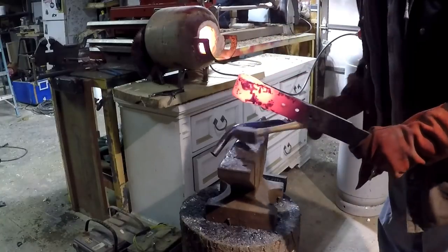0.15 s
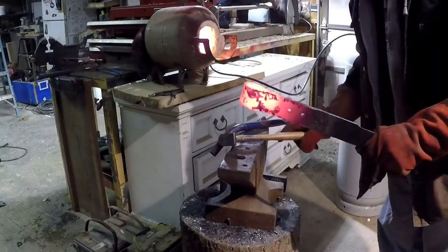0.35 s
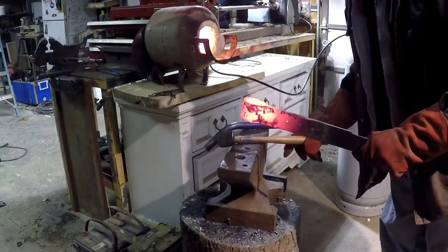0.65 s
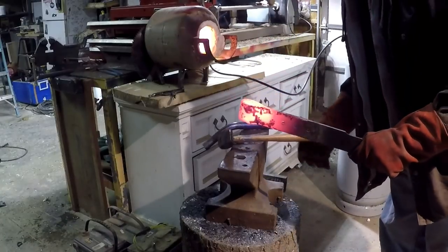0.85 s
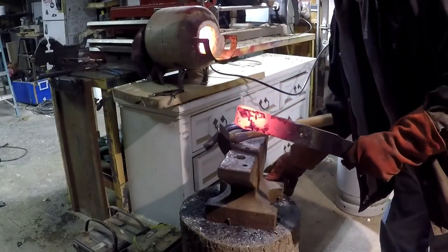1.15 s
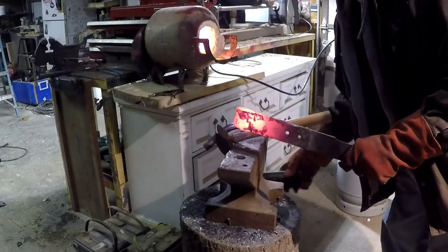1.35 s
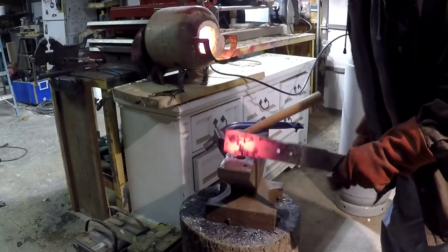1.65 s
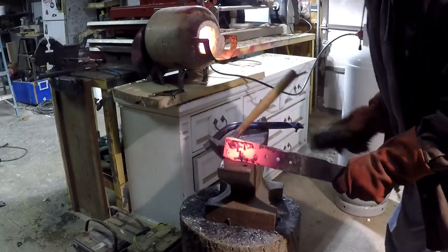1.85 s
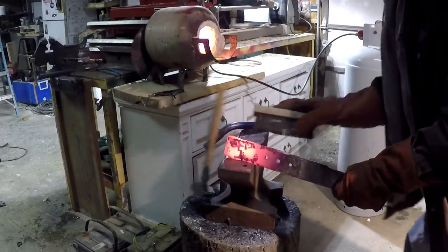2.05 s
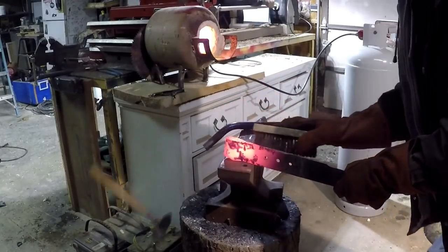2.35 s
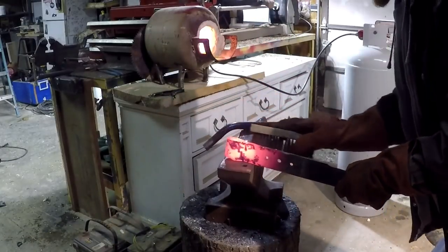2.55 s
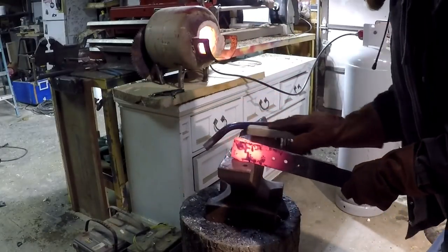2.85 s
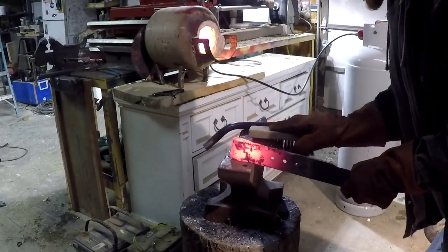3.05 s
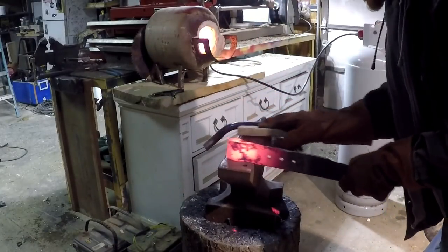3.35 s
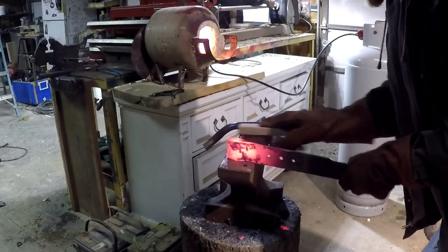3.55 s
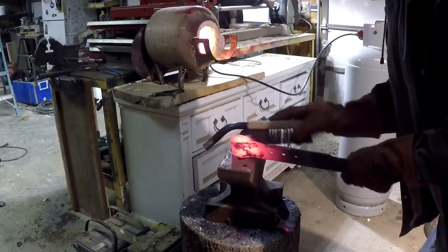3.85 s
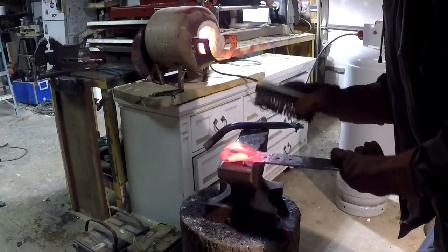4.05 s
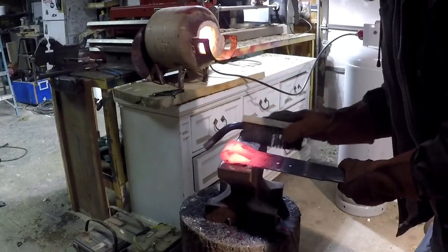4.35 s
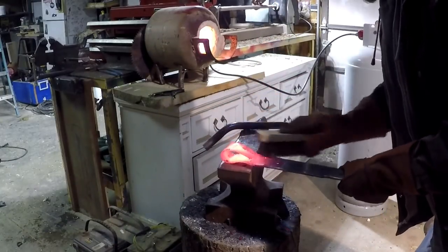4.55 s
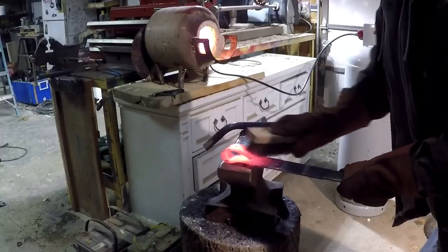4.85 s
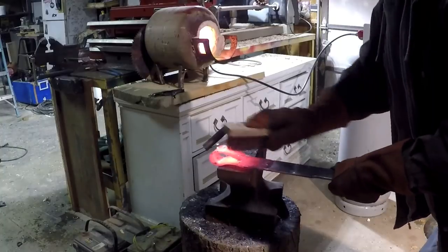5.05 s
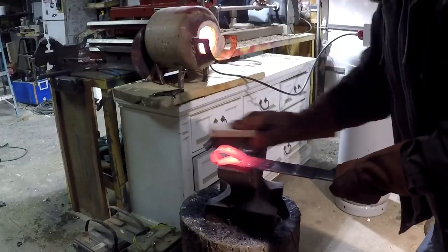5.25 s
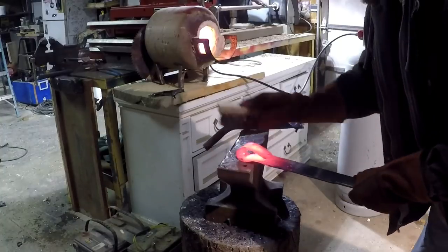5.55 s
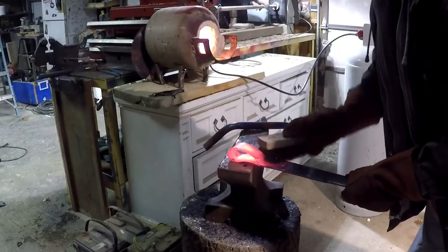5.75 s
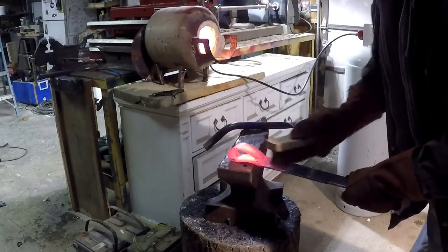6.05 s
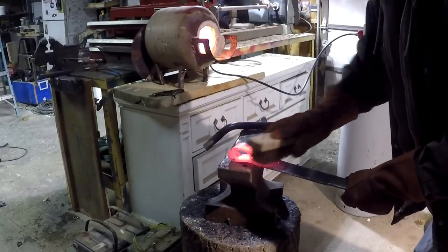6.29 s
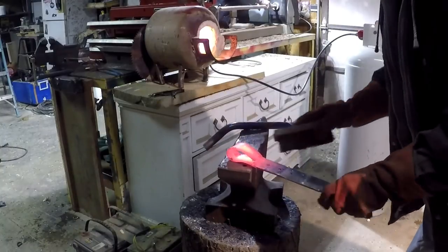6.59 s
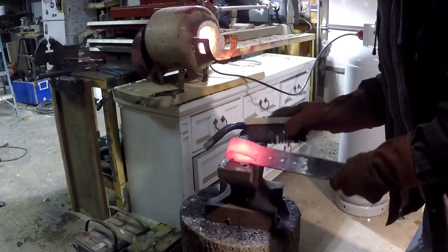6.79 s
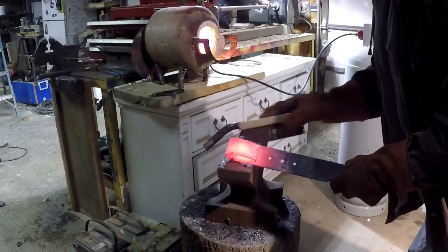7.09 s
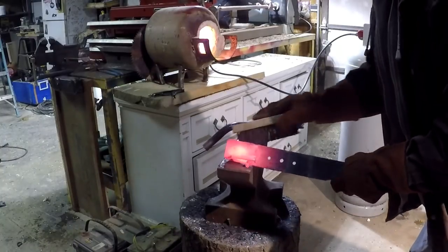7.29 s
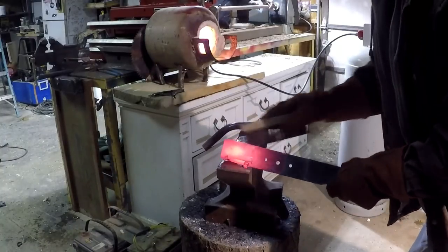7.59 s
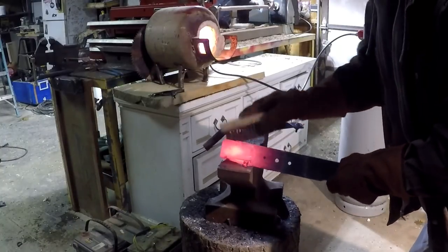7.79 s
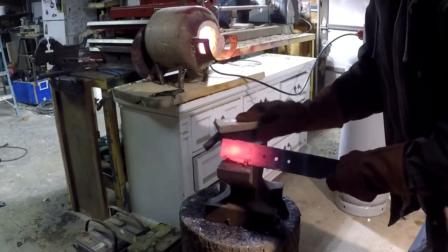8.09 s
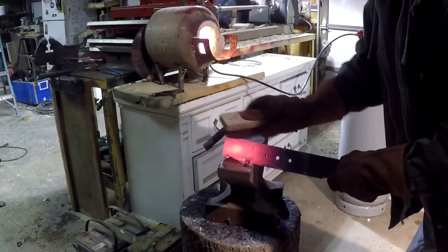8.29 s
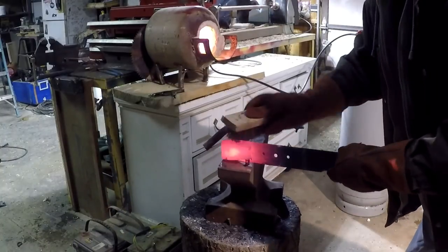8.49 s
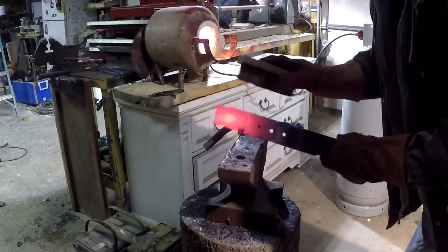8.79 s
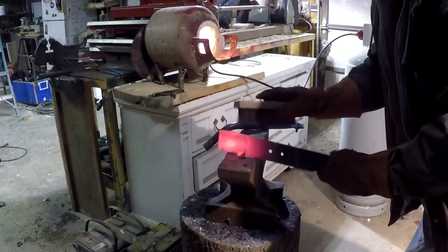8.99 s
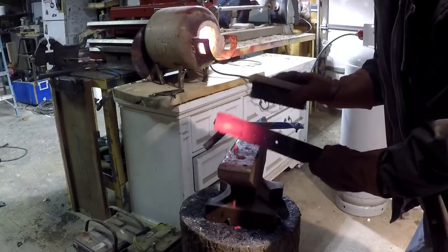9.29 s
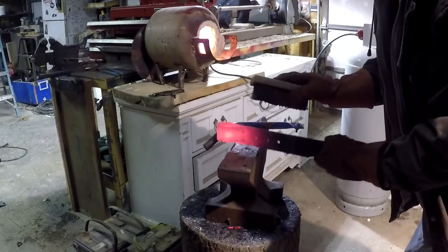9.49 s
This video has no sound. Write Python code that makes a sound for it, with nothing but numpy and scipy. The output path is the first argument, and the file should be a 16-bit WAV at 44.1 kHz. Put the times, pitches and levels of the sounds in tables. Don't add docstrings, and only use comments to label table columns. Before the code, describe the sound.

Throughout, a gas forge roars close by in a garage: deep, loud, turbulent burning noise with boomy resonances, plus a thin steady gas hiss. Faint rustling opens it, with a light hammer tap at 0.3 s. At 1.8 s a steel bar clinks brightly. At 2.1 s the hammer slides off, a block knocks at 2.3, and the hammer lands hard at about 2.7, its handle bouncing in quick taps, tipping over with a ringing clack near 3.0. Soft wire-brush scrapes follow from 3.2, with faint ticks near 3.6-4.2. A hard clink at 4.9 begins faster rasping strokes; knocks fall at 5.8, 6.05 and 6.4, where brushing is loudest and scratchiest. Sweeps soften from 7 to 8.9. The bar clanks on the anvil face at 9.1, its edge at 9.3, and a short knock comes at 9.5. The small stereo microphone compresses the roar; treble is cut off.

```python
import sys
import numpy as np
from scipy import signal
from scipy.fft import rfft, irfft
from scipy.io import wavfile
from scipy.ndimage import uniform_filter1d, minimum_filter1d

SR = 44100
rng = np.random.default_rng(int(sys.argv[2]) if len(sys.argv) > 2 else 0)


def convert_level_to_amplitude(level_db):
    exponent = np.asarray(level_db, float) / 20
    return 10 ** exponent


def transcribe(signal):
    frames = np.atleast_2d(signal).T
    limited = np.clip(frames, -1, 1)
    pcm = np.round(limited * 32767).astype(np.int16)
    wavfile.write(sys.argv[1], SR, pcm)


N = 424683
HZ = np.fft.rfftfreq(N, 1 / SR)


def evened(x):
    return x / np.sqrt(np.mean(x ** 2) + 1e-20)


def smoothed(x, samples):
    return uniform_filter1d(uniform_filter1d(x, samples), samples)


def read(points, hz, column=1):
    rows = np.transpose(points)
    return np.interp(np.log(hz + 1), np.log(rows[0] + 1), rows[column])


def ports(near, other):
    # pitch_hz, level_db, lead_rad, likeness [0-1]
    port_table = [(20, -2, -.2, .98), (100, -4, -.2, .99), (200, -7.5, -.15, 1), (300, -12, -.1, .99),
                  (345, -18, .3, .92), (370, -15.5, .4, .93), (402, -22, 1, .6), (440, -16, 1.9, .97),
                  (520, -10.5, 2.6, .99), (620, -7, 2.9, .95), (760, -10.5, 3, .8), (1000, -4, 1.8, .65),
                  (1500, -1, 1.2, .7), (2300, -.5, .8, .68), (3600, -1, .15, .85), (5000, -4, .2, .5),
                  (5800, -6, .4, .6), (7400, 2, 1.2, .3), (9000, 0, 0, .12), (14000, -1, 0, .3)]
    level_db, lead_rad, likeness = (read(port_table, HZ, column=k) for k in (1, 2, 3))
    likeness = np.clip(likeness, 0, 1)
    shared = likeness * np.exp(1j * lead_rad) * rfft(near)
    unrelated = np.sqrt(1 - likeness ** 2) * rfft(other)
    left = irfft(convert_level_to_amplitude(level_db) * (shared + unrelated), N)
    return np.array([left, near])


def coloured(pair, gain):
    near, other = irfft(rfft(pair) * gain, N)
    scale = np.std(near)
    return ports(near / scale, other / scale)


def jet():
    # pitch_hz, density_db_per_hz
    jet_spectrum = [(470, -38.5), (800, -2.5), (960, -10), (1230, -10), (1300, -9), (1560, -9),
                    (1850, -12.5), (2150, -14.5), (2770, -22.5), (3370, -19), (4090, -24.5), (6340, -21),
                    (8500, -33), (10300, -41), (14700, -66)]
    level_db, waver_db = -40.5, 1.3
    waver = evened(smoothed(rng.standard_normal(N), 3000))
    hiss = coloured(rng.standard_normal((2, N)), convert_level_to_amplitude(read(jet_spectrum, HZ)))
    return convert_level_to_amplitude(level_db + waver_db * waver) * hiss


def clatter(t60_s, length=16384):
    # pitch_hz, t60_factor
    shop_decay = [(500, 2), (2000, 1.42), (5000, 0.95), (7800, 1.3), (9500, 0.86)]
    hz, t, z = signal.stft(rng.standard_normal((2, length)), SR, nperseg=128)
    band_t60_s = t60_s * read(shop_decay, hz)[:, None]
    tail = signal.istft(z * convert_level_to_amplitude(-60 * t / band_t60_s), SR, nperseg=128)[1][:, :length]
    tail *= np.clip((np.arange(length) / SR - 0.001) / 0.0014, 0, 1)
    return tail / np.linalg.norm(tail[0])


def blow(modes, crack_hz, ring_db, clatter_db, t60_s, rough=0.45):
    strike_db, strike_s = 6.5, 0.0026
    t = np.arange(16384) / SR
    crack = np.exp(-t * crack_hz * 2.22) * np.sin(2 * np.pi * crack_hz * t)
    slap = crack + 0.087 * np.roll(crack, 62) - 0.33 * np.roll(crack, 115)

    wander = rng.standard_normal((2, len(modes), len(t) // 4))
    level_flutter, phase_flutter = evened(smoothed(wander, 50)).repeat(4, axis=-1)
    hz, db, decay_s = np.transpose(modes)[:, :, None]
    fade = convert_level_to_amplitude(db - 60 * t / decay_s) + convert_level_to_amplitude(db / 2 + strike_db) * np.exp(-t / strike_s)
    tones = np.sin(2 * np.pi * hz * t + rough * phase_flutter)
    ring = (fade * (1 + rough * level_flutter / 2) * tones).sum(axis=0)
    ring *= convert_level_to_amplitude(ring_db) * (1 - np.exp(-t / 0.0002))

    source = 3.64 * crack + 0.62 * ring
    tail = signal.fftconvolve(source[None], clatter(t60_s), axes=1)[:, :len(t)]
    return 1.9 * slap + 0.73 * ring + convert_level_to_amplitude(clatter_db) * tail


def struck(modes, crack_hz, clatter_db, blows):
    out = np.zeros((2, N + SR))
    for start_s, peak_db, ring_db, t60_s in blows:
        sound = convert_level_to_amplitude(peak_db) * blow(modes, crack_hz, ring_db, clatter_db, t60_s)
        start = round(start_s * SR)
        out[:, start:start + sound.shape[1]] += sound
    return out[:, :N]


def hammer():
    # pitch_hz, level_db, t60_s
    peen_modes = [(2385, 0, .3), (2272, -5, .06), (3844, -4, .04), (2040, -6, .05), (950, -3, .03)]
    hammer_modes = [(2385, 0, .2), (2272, -8, .08), (1830, -9, .1), (990, -8, .05), (1340, -10, .08),
                    (3844, -16, .1), (3100, -11, .05), (4600, -13, .04)]
    handle_modes = [(1346, 0, .09), (2223, -1, .1), (1830, -5, .08), (3838, -12, .06), (915, -6, .05)]
    flat_modes = [(2135, 0, .22), (1631, -9, .1), (1960, -9, .08), (3063, -10, .1), (3795, -13, .1),
                  (4600, -10, .06)]
    edge_modes = [(2220, 0, .17), (1927, -9, .06), (2487, -8, .06), (2821, -7, .07), (3117, -8, .05),
                  (3951, -7, .1), (3700, -9, .06), (4300, -11, .04), (5771, -14, .25)]
    # start_s, peak_db, ring_db, clatter_t60_s
    peen_blows = [
        (0.3342, -16, -12.5, 0.23),
    ]
    hammer_blows = [
        (2.1134, -12.5, -10, 0.34),
    ]
    handle_blows = [
        (2.166, -18.5, -13, 0.23),
        (2.6724, -15, -29, 0.46),
        (2.74, -21, -22, 0.26),
        (2.813, -20, -18, 0.21),
        (2.8321, -19.5, -22, 0.083),
        (2.8474, -31.5, -8, 0.14),
    ]
    flat_blows = [
        (2.683, -5, -17, 0.47),
    ]
    edge_blows = [
        (2.9657, -8, -11, 0.33),
        (3.045, -25.5, -8.5, 0.37),
    ]
    return (struck(peen_modes, 2310, 1.5, peen_blows) + struck(hammer_modes, 2230, 0.6, hammer_blows)
            + struck(handle_modes, 1600, 1.4, handle_blows) + struck(flat_modes, 2820, 1.2, flat_blows)
            + struck(edge_modes, 3150, -0.8, edge_blows))


def bar():
    # pitch_hz, level_db, t60_s
    bar_modes = [(2374, -2, .14), (4269, -1, .2), (4183, -5, .1), (3400, -6, .05), (5728, -1, .17),
                 (5900, -3, .12), (6072, -1, .17), (6400, -7, .08)]
    flat_modes = [(5700, -2, .03), (5905, 0, .04), (6126, -2, .03), (6470, -3, .03), (6864, -6, .03),
                  (3300, -8, .02), (12000, -15, .01), (8900, -12, .01)]
    # start_s, peak_db, ring_db, clatter_t60_s
    bar_blows = [
        (1.81, -7.5, -21, 0.33),
    ]
    flat_blows = [
        (3.046, -28, -19, .15),
        (3.089, -27.5, -14.5, .2),
        (4.1756, -24, -15, 0.16),
        (4.8931, -8, -18.5, 0.16),
        (5.7664, -19.5, -9.5, 0.2),
        (6.3808, -24, -10, 0.23),
    ]
    return struck(bar_modes, 4240, -6, bar_blows) + struck(flat_modes, 5600, -2.1, flat_blows)


def block():
    # pitch_hz, level_db, t60_s
    block_modes = [(871, 1, 0.16), (1573, -4, 0.11), (2850, -8, 0.024), (3200, -10.5, .03),
                   (5930, -11, .01), (7670, -15, .01)]
    # start_s, peak_db, ring_db, clatter_t60_s
    block_blows = [
        (2.296, -10.5, -26.5, 0.37),
        (2.3062, -20, -12.5, 0.33),
        (3.5753, -31.5, -20, 0.25),
        (3.83, -31.5, -13, 0.29),
        (4.177, -25.5, -28, 0.25),
        (5.7637, -13.5, -18.5, 0.21),
        (6.379, -17, -31, 0.27),
        (9.5252, -13.5, -13.5, 0.14),
    ]
    return struck(block_modes, 2970, 1.2, block_blows)


def brush_back():
    # pitch_hz, level_db, t60_s
    back_modes = [(3390, 1, 0.039), (3710, 5, 0.016), (2300, -22, 0.092), (1920, -6, 0.081),
                  (4470, -5, 0.059), (5880, 3.5, 0.028), (2630, -6, .025)]
    # start_s, peak_db, ring_db, clatter_t60_s
    back_blows = [
        (6.0567, -8.5, -19, 0.24),
    ]
    return struck(back_modes, 3650, -0.46, back_blows)


def anvil():
    # pitch_hz, level_db, t60_s
    face_modes = [(1798, 0, .28), (2005, -4, .2), (2360, -1, .25), (2180, -4, .2), (2560, -4, .18),
                  (1260, -6, .15), (2875, -6, .06), (3461, -8, .08), (4350, -8, .1), (5900, -12, .08),
                  (900, -5, .05)]
    edge_modes = [(3050, 0, .05), (3480, 0, .14), (4450, -2, .07), (6000, -4, .04), (7400, -6, .04),
                  (2360, -5, .2), (1798, -5, .15), (1000, -4, .04)]
    # start_s, peak_db, ring_db, clatter_t60_s
    face_blows = [
        (9.065, -7, -18, 0.4),
    ]
    edge_blows = [
        (9.3105, -7.5, -19.5, 0.29),
    ]
    return struck(face_modes, 3030, -5.5, face_blows) + struck(edge_modes, 3300, -5, edge_blows)


def taps():
    # pitch_hz, level_db
    case_response = [(400, -22.5), (900, 2.5), (2000, -2), (6500, 0.5), (7800, 0), (8800, -14.5),
                     (12000, -9), (15000, -22.5)]
    blows = hammer() + bar() + block() + brush_back() + anvil()
    return ports(*irfft(rfft(blows) * convert_level_to_amplitude(read(case_response, HZ)), N))


def pressure():
    # start_s, length_s, pressure_db
    stroke_table = [(-.05, .35, -52), (0.283, 0.25, -50), (1.313, .42, -58.5), (2.24, .17, -52.5),
                    (2.528, 0.25, -56), (3.204, .17, -52), (3.407, 0.19, -53), (3.647, .24, -53.5),
                    (4.147, 0.077, -57.5), (4.65, 0.057, -48.5), (4.91, .1, -49), (5.052, 0.091, -51),
                    (5.185, 0.11, -49), (5.318, .2, -50.5), (5.69, 0.21, -49), (5.75, 0.29, -45.5),
                    (6.05, .18, -39.5), (6.265, 0.31, -41), (6.601, 0.29, -46), (6.912, .47, -45),
                    (7.422, .12, -48), (7.569, .19, -50.5), (7.798, .12, -51.5), (8.049, 0.15, -52.5),
                    (8.365, .1, -50.5), (8.494, .4, -50.5), (9.08, 0.19, -55.5), (9.318, 0.09, -49),
                    (9.512, .15, -51)]
    press_s, lift_s, sag_db_per_s = 0.017, 0.063, -7
    hover_db = -60.5
    t = np.arange(0, N + 64, 64) / SR
    start_s, length_s, pressure_db = np.transpose(stroke_table)[:, :, None]
    age_s = t - start_s
    shape = np.clip(age_s / press_s, 0, 1) * np.exp(-np.maximum(age_s - length_s, 0) / lift_s)
    sag_db = sag_db_per_s * np.clip(age_s - length_s / 2, -1, 1)
    stroke_power = (shape * convert_level_to_amplitude(pressure_db + sag_db)) ** 2
    total = np.sqrt(stroke_power.sum(axis=0) + convert_level_to_amplitude(hover_db) ** 2)
    return np.interp(np.arange(N) / SR, t, total)


def brush(flicks_per_s=9000, spread_db=3):
    # pitch_hz, level_db
    wire_spectrum = [(1060, -39), (1800, -23.5), (2070, -5), (2280, -15), (3240, -9), (4650, -9),
                     (5540, -1.5), (7410, -5), (8750, -15.5), (10400, -18.5), (11300, -25.5),
                     (13600, -26.5), (14700, -34)]
    flicks = (rng.random((2, N)) < flicks_per_s / SR) * rng.standard_normal((2, N))
    flicks *= convert_level_to_amplitude(spread_db * np.minimum(rng.exponential(1, (2, N)), 4))
    return pressure() * convert_level_to_amplitude(4.0) * coloured(flicks, convert_level_to_amplitude(read(wire_spectrum, HZ)))


def roar():
    # pitch_hz, density_db_per_hz
    flame_spectrum = [(15, -32), (30, -39), (45, -11.5), (100, -14.5), (380, -16.5), (480, -12), (620, -19),
                      (720, -33.5), (850, -37), (1000, -41.5), (1150, -50.5), (2000, -70), (22000, -120)]
    # pitch_hz, width_hz, level_db
    chamber_waves = [(55.1, 14.4, -5.5), (72.8, 7.9, 0), (133, 38, -5), (171.6, 30.8, 0), (187, 4.5, -24),
                     (216.5, 20, -7.5), (238.3, 6.3, -7), (248.6, 19.3, -8.5), (297.6, 32, -5.5),
                     (330, 17.6, -6), (342.6, 4.2, -7.5), (429, 7.5, -6), (448, 3.2, -14), (526, 8.1, -9.5),
                     (538.3, 21.8, -7), (561, 36, -14.5), (572, 3.3, -26), (654, 17, -31.5),
                     (669.7, 14, -20.5), (737, 16, -25), (798, 5, -25), (920, 19, -35), (1216, 3.3, -33),
                     (1540, 9.7, -34.5)]
    level_db = -6.5
    power = convert_level_to_amplitude(read(flame_spectrum, HZ)) ** 2
    for pitch_hz, width_hz, wave_db in chamber_waves:
        detune = 2 * (HZ - pitch_hz) / width_hz
        power = power + convert_level_to_amplitude(wave_db) ** 2 / (1 + detune ** 2) ** 2
    return convert_level_to_amplitude(level_db) * coloured(rng.standard_normal((2, N)), np.sqrt(power))


def scene():
    return jet() + taps() + brush() + roar()


def band_limit(x):
    return signal.sosfilt(signal.butter(12, 14850, fs=SR, output="sos"), x)


def record(dry):
    attack_s, threshold_db, ceiling = 0.011, -12, 0.93
    keep = np.exp(-1 / (attack_s * SR))
    power = signal.lfilter([1 - keep], [1, -keep], (dry ** 2).max(0))
    power_db = 10 * np.log10(power + 1e-12)
    over_db = uniform_filter1d(np.maximum(power_db - threshold_db, 0), 120)
    held = dry / convert_level_to_amplitude(0.5 * over_db)
    room_left = np.minimum(ceiling / (abs(held).max(0) + 1e-9), 1)
    held = held * smoothed(minimum_filter1d(room_left, size=257), 128)
    return band_limit(held)


dry = scene()
out = record(dry)
transcribe(out)
```